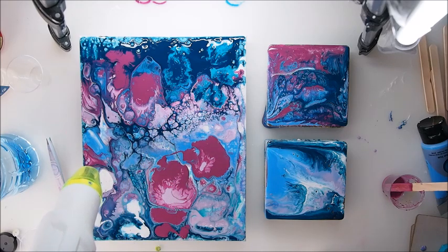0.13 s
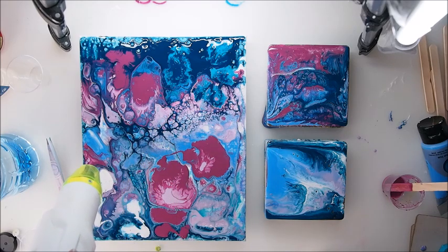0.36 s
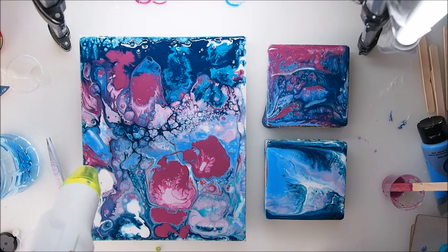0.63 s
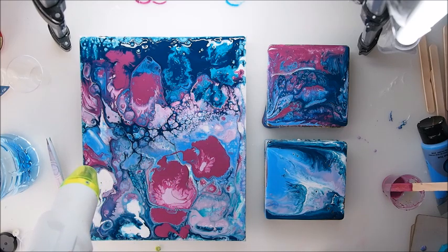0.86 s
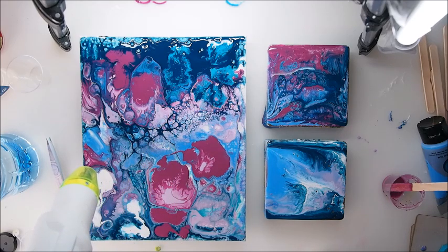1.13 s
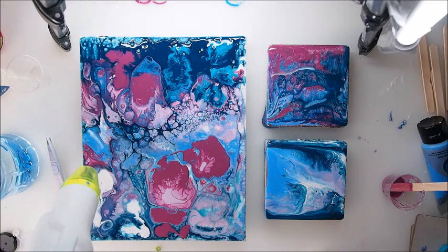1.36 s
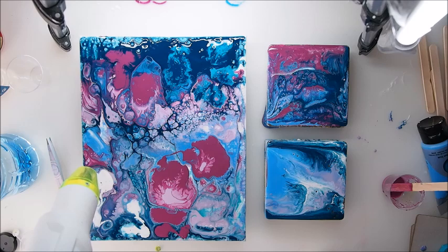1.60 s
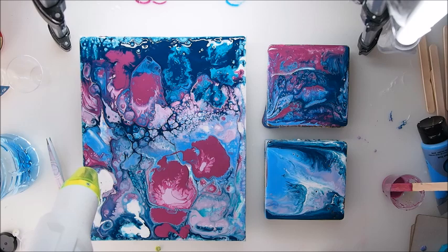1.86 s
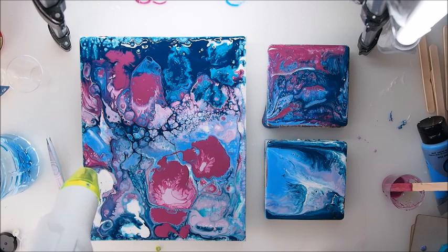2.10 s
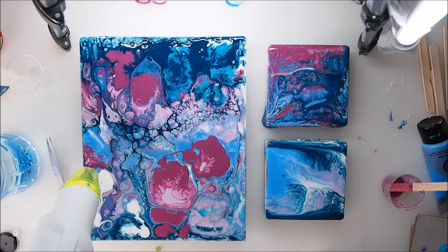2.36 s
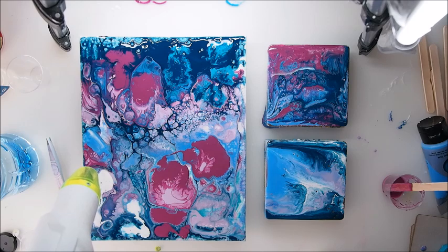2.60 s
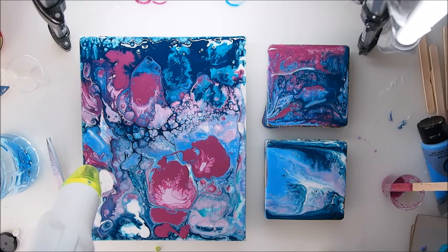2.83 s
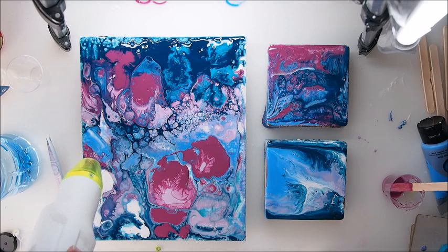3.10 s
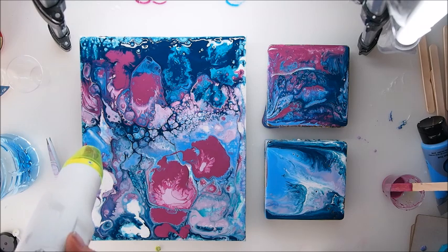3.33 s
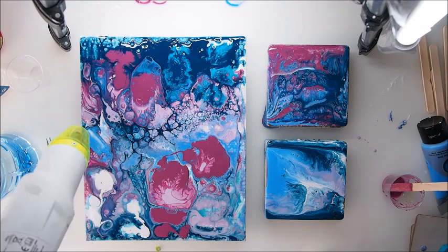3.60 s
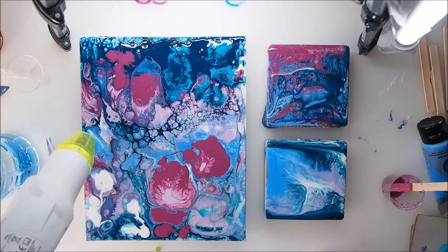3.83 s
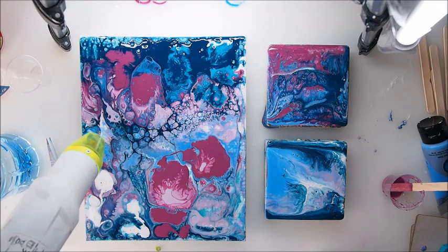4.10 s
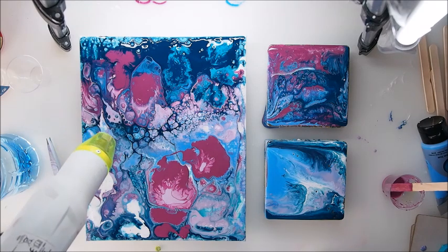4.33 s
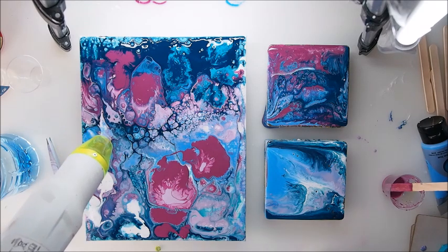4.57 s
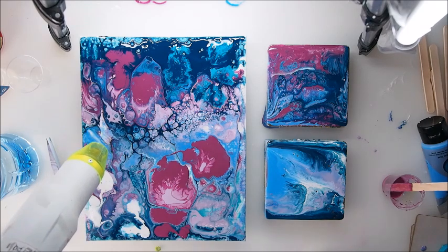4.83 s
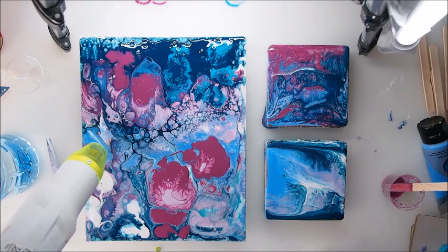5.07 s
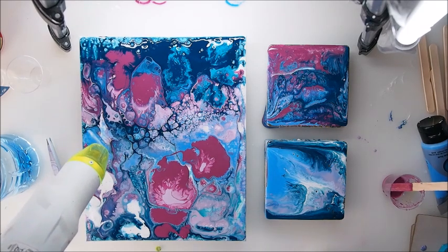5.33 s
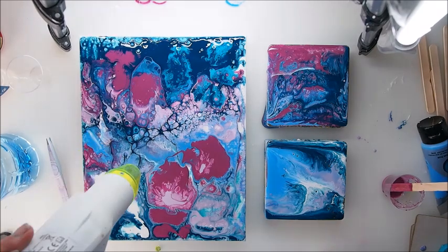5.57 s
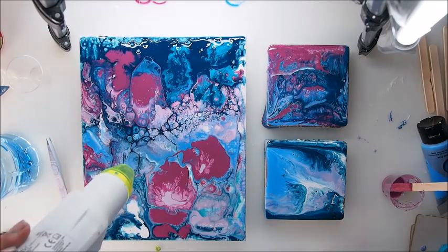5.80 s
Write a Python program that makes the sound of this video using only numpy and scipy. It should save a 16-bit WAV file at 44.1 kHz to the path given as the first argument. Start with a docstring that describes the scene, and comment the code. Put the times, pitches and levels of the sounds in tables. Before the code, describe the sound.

Close stereo pickup of a little electric heat gun over a table in a home workroom, slightly stronger on the right. Dense rushing air, ringing in the barrel, with a buzzy, rough-edged motor whine at constant pitch. Around three seconds in, movement makes the timbre swirl and some whine tones swap in strength. It ends with an abrupt stop and no run-down, then nothing.

```python
"""A home workroom: a small hand-held hot-air blower runs over a table, close to two microphone ports.
Its motor whines on multiples of the shaft speed, the air stream rings in the barrel and hisses openly.
Held still at first, the tool is then lifted, swung and turned, which changes what reaches each port.
Hiss from the intake end and echoes off the near things colour the air sound. The sound stops dead."""
import sys
import numpy as np
from scipy import signal
from scipy.fft import rfft, irfft, next_fast_len
from scipy.io import wavfile
from scipy.ndimage import map_coordinates

SR = 44100
rng = np.random.default_rng(int(sys.argv[2]) if len(sys.argv) > 2 else 0)


def wav_out(sig):
    """Save sig, one row per channel (or a flat mono array), as 16-bit PCM at SR to the path in sys.argv[1]."""
    wavfile.write(sys.argv[1], SR, np.round(np.clip(np.atleast_2d(sig).T, -1, 1) * 32767).astype(np.int16))


def to_linear_factor(level_db):
    """Convert decibel levels (scalar or array-like) to linear amplitude factors."""
    exponent = np.asarray(level_db, float) / 20
    return 10 ** exponent


N = 261950

# the motor's speed: t/s, shaft f/Hz
SHAFT_SPEED = [(0.05, 299.9), (0.75, 300.15), (1.25, 300.85), (2.2, 300.9), (3.15, 300.5), (3.45, 300.7),
               (3.68, 301.45), (4.05, 301.7), (4.5, 302.25), (5.0, 302.4)]
# whine lines at the left port: multiple of shaft speed, rms level/dB of the middle line in the four poses,
# lower and upper throb line level/dB against the middle line, left port's lead/rad
WHINE_LINES = [(1, -57.5, -54, -52.5, -53, -32, -28, 0.12), (3, -44, -47, -54, -49, -22.5, -21, 0.071),
               (4, -56.5, -57, -49.5, -43.5, -20.5, -19, -.4), (5, -40, -35, -41, -34.5, -14, -12.5, -0.76),
               (6, -34.5, -33.5, -44.5, -38.5, -14, -32.5, 0.59),
               (7, -51.5, -50.5, -39, -46, -16.5, -18, .6), (8, -49.5, -55, -49, -56, -5, 1.5, 0),
               (9, -39.5, -44, -47.5, -51, -21.5, -22.5, -0.58),
               (10, -44.5, -30.5, -33.5, -36, -12.5, -8.5, -1.2),
               (11, -57.5, -61.5, -53.5, -48, -9, -13, -.5),
               (12, -47.5, -55.5, -55, -54.5, -14, -9.5, -0.061),
               (15, -46, -43, -50, -50.5, -11.5, -4, -1.1), (20, -56.5, -53, -55.5, -54.5, -9.5, 6.5, -1)]
THROB_HZ = 51.02


def whine(pose):
    """Near-sines on multiples of the shaft speed; a fast throb of the motor puts a line on each side."""
    shaft_hz, = in_time(SHAFT_SPEED)
    turn = 2 * np.pi * np.cumsum(shaft_hz) / SR + 0.021 * drift(4.2)   # rad
    throb = np.exp(2j * np.pi * THROB_HZ * np.arange(N) / SR)
    out = 0
    for order, *left_db, lower_db, upper_db, lead in WHINE_LINES:
        waver_db = 0.8 * drift(4)
        middle, lower, upper = np.exp(2j * np.pi * rng.random(3))   # starting phases
        sides = lower * to_linear_factor(lower_db) / throb + upper * to_linear_factor(upper_db) * throb
        line = np.exp(1j * order * turn) * (middle + sides)
        pair = np.real(line * np.exp(1j * lead * np.array([[1], [0]])))
        gains = both_ports(left_db, order * shaft_hz.mean(), pose)
        out = out + np.sqrt(2) * pair * gains * to_linear_factor(waver_db)
    return out


# barrel and table resonances: f/Hz, width/Hz, peak level/dB per Hz at the left port in the four poses,
# before the intake, hollows and echoes
RESONANCES = [(578, 58, -53.5, -55, -58.5, -57), (633.3, 43, -59, -57.5, -55, -59),
              (713.3, 22, -61, -55.5, -72, -58.5), (918, 180, -68.5, -66.5, -71, -69),
              (1220, 130, -70.5, -66, -65, -64), (1545, 296, -64.5, -61, -68, -62),
              (1767, 255, -77.5, -73, -59.5, -60), (1904, 53, -61.5, -60, -75, -76.5),
              (2298, 180, -67, -70.5, -65, -72.5), (3040, 227, -72.5, -56, -62, -64),
              (3163, 100, -77.5, -61, -56, -63.5), (3190, 170, -75, -75, -70.5, -60),
              (3410, 66, -68, -75.5, -77.5, -58.5), (3682, 197, -63, -67, -65.5, -78),
              (4502, 240, -68.5, -60.5, -70, -85), (5020, 410, -67, -65, -64.5, -66.5),
              (5735, 260, -63.5, -65.5, -66.5, -69), (6140, 320, -64, -68.5, -70.5, -65),
              (6770, 460, -61, -64.5, -65.5, -65.5), (7380, 410, -65.5, -68, -68.5, -66.5),
              (8300, 1100, -68.5, -70.5, -71.5, -71.5), (10900, 540, -73, -76.5, -77, -74),
              (12050, 700, -75, -74, -74.5, -75), (14500, 700, -75.5, -77, -75.5, -79.5)]


def barrel(pose):
    """Turbulence rings in each resonance; neighbours are fed by unrelated eddies."""
    eddies = [turbulence(lambda hz: 0 * hz) for _ in range(2)]
    out = 0
    for k, (hz, width_hz, *left_db) in enumerate(RESONANCES):
        edges_hz = [hz - width_hz / 2, hz + width_hz / 2]
        band = signal.butter(2, edges_hz, "band", fs=SR, output="sos")
        ring = signal.sosfilt(band, eddies[k % 2])
        flutter_db = 0.7 * drift(2.7)
        out = out + ring * both_ports(left_db, hz, pose) * to_linear_factor(flutter_db)
    return out


# open jet at the left port, before the intake, hollows and echoes:
# f/Hz, level/dB per Hz while held, level/dB per Hz once moved
JET_COLOUR = [(25, -94.5, -94.5), (50, -101, -102), (100, -87.5, -87), (204, -77.5, -78),
              (384, -72.5, -72.5), (710, -60.5, -66.5), (1120, -74, -75), (2075, -66.5, -73.5),
              (2600, -69.5, -71.5), (3400, -75, -72), (4200, -69.5, -72), (6960, -76, -75),
              (9000, -71.5, -72), (12200, -78, -77.5), (16000, -77.5, -79.5)]


def jet(pose):
    """The open stream hisses broadly; its colour changes as the tool leaves its first place."""
    right = np.array([[0], [1]])

    def held_db(hz):
        return at_hz(JET_COLOUR, hz, axis=1) + right_louder(hz)[0] * right

    def moved_db(hz):
        return at_hz(JET_COLOUR, hz, axis=2) + right_louder(hz)[1:].mean(axis=0) * right

    held, moved = turbulence(held_db), turbulence(moved_db)
    away = np.clip(pose, 0, 1)
    flutter_db = 0.5 * drift(19.0)
    return (np.sqrt(1 - away) * held + np.sqrt(away) * moved) * to_linear_factor(flutter_db)


# how alike the two ports hear the air: f/Hz, likeness 0-1
PORT_LIKENESS = [(70, .1), (125, .7), (200, 0.6), (600, 1), (1200, .8), (2500, 0.9), (4500, .7), (7000, 1),
                 (10000, 0.49), (15000, .55)]
# phase by which the left port trails in the air sound: f/Hz, phase/rad
LEFT_TRAILING = [(200, 0), (2000, 0.45), (4500, 0.67), (7000, 1.0), (9000, 1.5), (12000, 3), (15500, 3.5)]


def turbulence(colour_db):
    """Coloured noise from 0 dB per Hz, partly shared by the ports; the rest has come round the room."""
    size = next_fast_len(N)
    hz = np.maximum(np.fft.rfftfreq(size, 1 / SR), 1)
    shared, other = rfft(rng.standard_normal((2, size))) * np.sqrt(SR / 2)
    alike = at_hz(PORT_LIKENESS, hz)
    pair = np.sqrt((1 + alike) / 2) * shared + np.sqrt((1 - alike) / 2) * other * [[1], [-1]]
    pair[0] *= np.exp(-1j * at_hz(LEFT_TRAILING, hz))
    return irfft(pair * to_linear_factor(colour_db(hz)), size)[:, :N]


def with_intake(air, intake_s, intake_share):
    """The intake end radiates the same hiss with opposite sign: broad combs slide as the tool turns."""
    band = signal.butter(1, [4050, 9000], "band", fs=SR, output="sos")
    treble = signal.sosfilt(band, air)
    return air - intake_share * np.array([delayed(port, intake_s) for port in treble])


# added lag of the air sound at the left port: one lag/s for each of the four poses
LEFT_LAG = [0, .8e-5, 1.0e-5, 1.5e-5]


def left_later(air, pose):
    """Air sound reaches the left port a little later once the tool has moved."""
    return np.array([delayed(air[0], by_pose(LEFT_LAG, pose)), air[1]])


# hollows where direct sound and the table's echo cancel: f/Hz, width/Hz, depth 0-1 in the four poses
TABLE_HOLLOWS = [(376.6, 33, 0.68, 0.27, .3, 0.49), (754, 18, .4, .1, .1, 0.69),
                 (1336, 44, 0.32, .2, .4, 0.73), (1690, 52, 0.24, .5, 0.37, .3),
                 (2250, 52, 0.046, 0.18, 0.44, 0.12), (2567, 110, 0.076, 0.5, .6, .75),
                 (2890, 69.3, 0.6, 0.18, 0.26, 0), (4160, 200, 0.05, 0.28, 0.19, 0.57),
                 (5070, 160, 0.021, .3, .2, .4)]


def hollows(air, pose):
    """Takes narrow bands out of the air sound, deeper in some poses."""
    for hz, width_hz, *depth in TABLE_HOLLOWS:
        band = signal.lfilter(*signal.iirpeak(hz, hz / width_hz, fs=SR), air)
        air = air - by_pose(depth, pose) * band
    return air


NEAR_ECHO_DB, NEAR_ECHO_T60_S, NEAR_ECHO_LOW_HZ = -13, 0.031, 700


def near_echoes(air, pose):
    """Jars, table and wall scatter a short dying tail; every pose and port has its own pattern."""
    age = np.arange(1024) / SR
    decay = to_linear_factor(-60 * age / NEAR_ECHO_T60_S) * (age > 5e-4)
    tails = rng.standard_normal((4, 2, len(age))) * decay
    # small things scatter little bass
    tails = signal.lfilter(*signal.butter(1, NEAR_ECHO_LOW_HZ, "high", fs=SR), tails)
    tails *= to_linear_factor(NEAR_ECHO_DB) / np.sqrt(np.sum(tails ** 2, axis=2, keepdims=True))
    out = 0
    for k, tail in enumerate(tails):
        share = np.sqrt(np.clip(1 - abs(np.clip(pose, 0, 3) - k), 0, 1))
        out = out + share * signal.oaconvolve(air, tail, axes=1)[:, :N]
    return out


# the hand: t/s, pose (0 held, 1 lifted, 2 swung, 3 turned), extra delay of the intake end/s, intake share 0-1
HAND_MOVES = [(3.02, 0, 2.25e-4, .1), (3.25, .5, 2.35e-4, .2), (3.36, .95, 2.5e-4, .4),
              (3.5, 1, 2.05e-4, .45), (3.58, 1.1, 2.25e-4, .45), (3.74, 1.9, 2.55e-4, .3),
              (3.83, 1.95, 2.1e-4, .45), (4.1, 2.25, 2.25e-4, .35), (4.19, 2.6, 2.5e-4, .5),
              (4.3, 2.95, 2.15e-4, .5), (4.42, 3, 1.8e-4, .45), (4.6, 3, 2.15e-4, .35),
              (4.95, 2.8, 2.4e-4, .3)]


def hand():
    """Pose, intake delay and intake share at every sample as the hand moves the tool."""
    return in_time(HAND_MOVES)


# the tool stands nearer the right port: f/Hz, right minus left level/dB
RIGHT_NEARER = [(60, 6), (150, 2), (400, 2.5), (1100, 1.5), (2400, 2), (4000, 3), (6000, 4), (9000, 1.5),
                (14000, -1)]
# bands where the table's echo sets the ports apart: f/Hz, half-width/Hz to 1/e of the dB value,
# added right minus left level/dB in the four poses
PORT_SHADE = [(1528, 120, -0.5, -2, 5.5, 5.5), (3077, 230, 11, 2.5, 0, -0.5),
              (3600, 220, 4.5, 5, 1.5, -0.5), (8400, 470, -2, 3.5, 4, 2), (10570, 450, 4.5, 1.5, 1.5, 4),
              (12100, 500, 4.5, 3, 1.5, 2)]


def right_louder(hz):
    """dB by which the right port hears a pitch louder, in the four poses."""
    shade = 0
    for at, width_hz, *db in PORT_SHADE:
        shade = shade + np.multiply.outer(db, np.exp(-((hz - at) / width_hz) ** 2))
    return at_hz(RIGHT_NEARER, hz) + shade


def both_ports(left_db, hz, pose):
    """Gains at the left and right port along the pose."""
    right_db = left_db + right_louder(hz)
    return to_linear_factor(np.array([by_pose(left_db, pose), by_pose(right_db, pose)]))


def by_pose(values, pose):
    """Blends four values along the hand's pose."""
    return np.interp(pose, range(4), values)


def at_hz(points, hz, axis=1):
    """Reads one column of an (f/Hz, ..) table on a log axis."""
    points = np.array(points)
    return np.interp(np.log(hz), np.log(points[:, 0]), points[:, axis])


def in_time(rows):
    """Columns of a (t/s, ..) table at every sample."""
    s, *columns = np.transpose(rows)
    return [np.interp(np.arange(N) / SR, s, column) for column in columns]


def drift(rate_hz):
    """Slow chance with spread 1: noise at one point per 64 samples through a double-pole low-pass."""
    r = np.exp(-128 * np.pi * rate_hz / SR)
    slow = signal.lfilter([1], [1, -2 * r, r * r], rng.standard_normal(N // 64 + 3002))
    slow = slow[3000:]   # the filter has settled
    return np.interp(np.arange(N) / 64, np.arange(len(slow)), slow / slow.std())


def delayed(x, seconds):
    """Reads a signal later by a time that may change."""
    return map_coordinates(x, [np.arange(N) - SR * seconds], order=3, mode="nearest")


def scene():
    """Jet and barrel pass the intake, lag, echoes and hollows; the whine carries its own phases."""
    pose, intake_s, intake_share = hand()
    air = jet(pose) + barrel(pose)
    air = with_intake(air, intake_s, intake_share)
    air = left_later(air, pose)
    air = hollows(air + near_echoes(air, pose), pose)
    return air + whine(pose)


def top_cut(x):
    """Nothing passes above the cut-off."""
    return signal.sosfilt(signal.butter(12, 15950, fs=SR, output="sos"), x)


PORT_NOTCH_HZ, PORT_NOTCH_WIDTH_HZ, PORT_NOTCH_DEPTH = 15000, 200, 0.65
STOP_S = 5.3765


def record(dry):
    """The microphone ports take a narrow dip out of the top octave; then the abrupt stop."""
    peak = signal.iirpeak(PORT_NOTCH_HZ, PORT_NOTCH_HZ / PORT_NOTCH_WIDTH_HZ, fs=SR)
    heard = dry - PORT_NOTCH_DEPTH * signal.lfilter(*peak, dry)
    on = np.arange(N) < STOP_S * SR
    return top_cut(heard * on)


dry = scene()
out = record(dry)
wav_out(out)
```